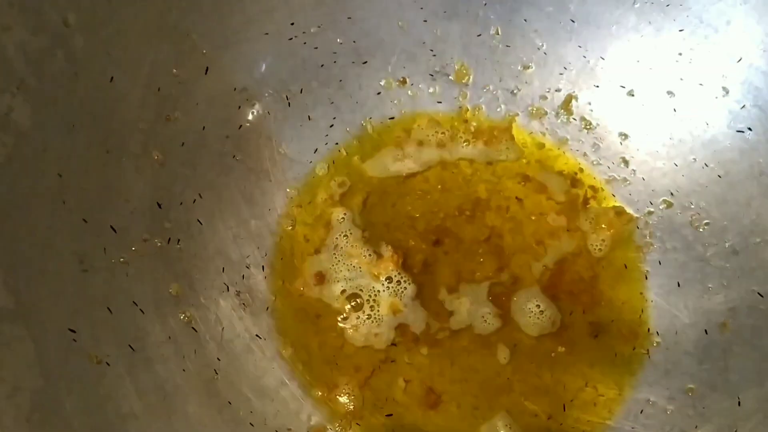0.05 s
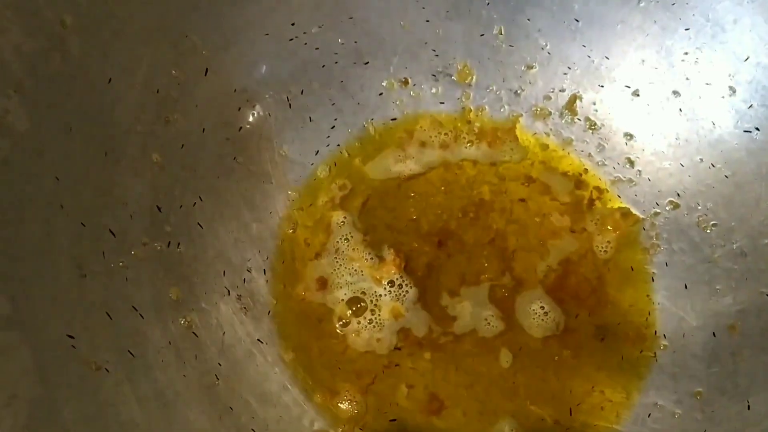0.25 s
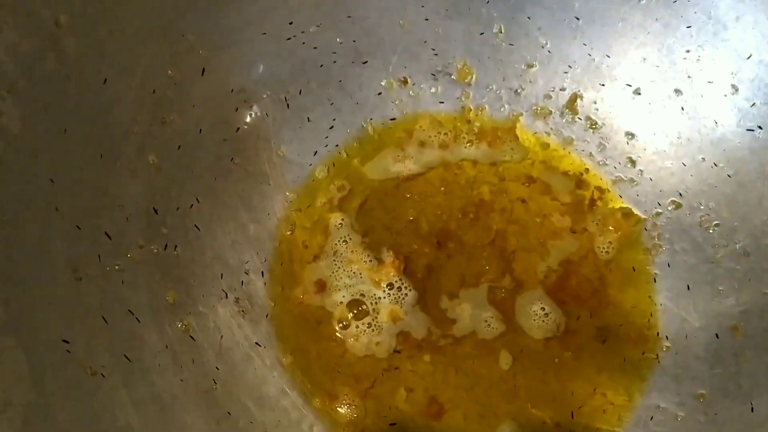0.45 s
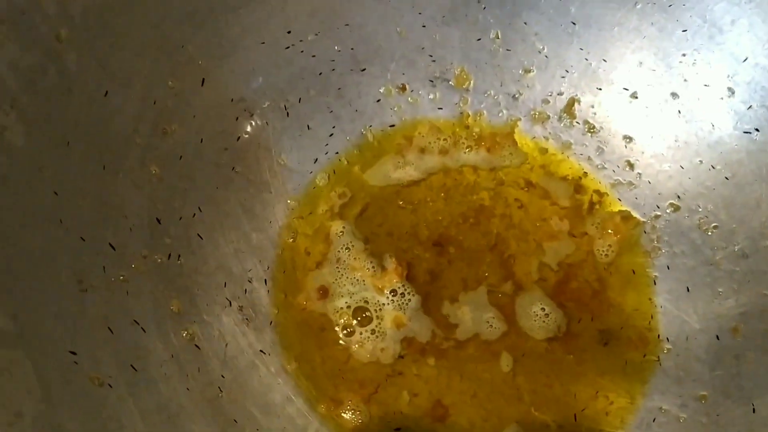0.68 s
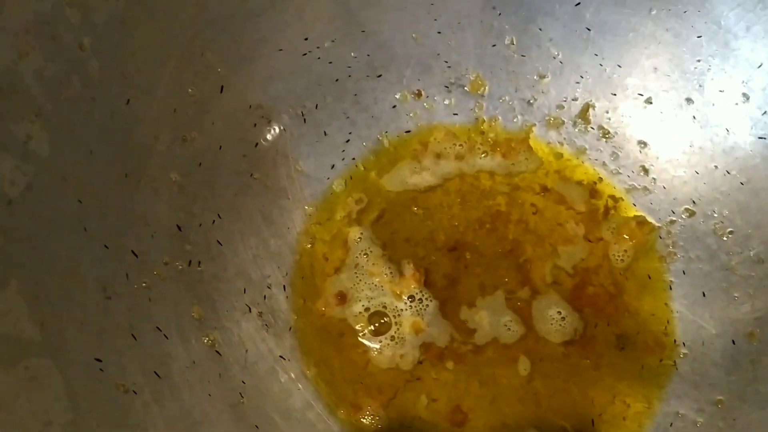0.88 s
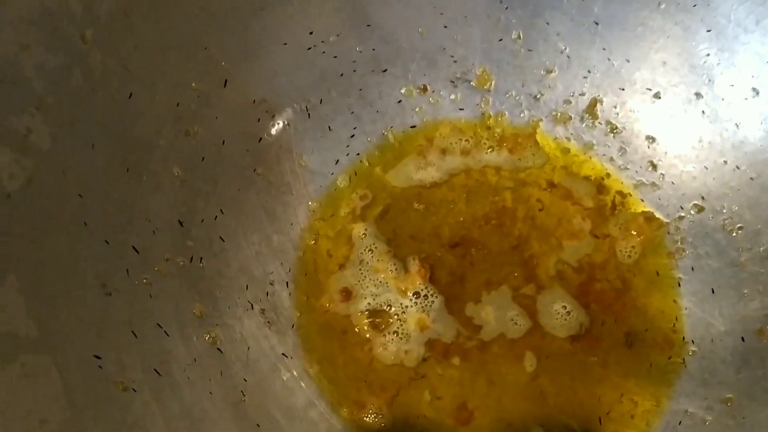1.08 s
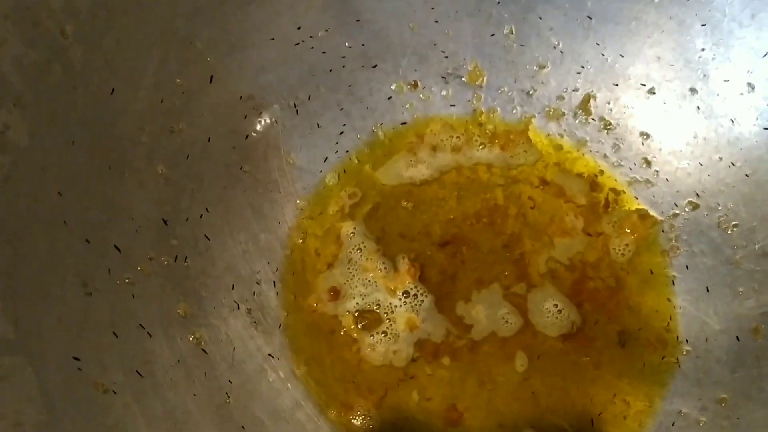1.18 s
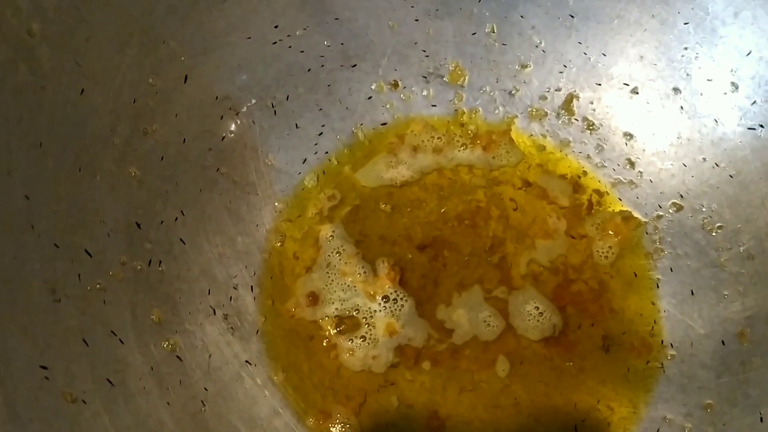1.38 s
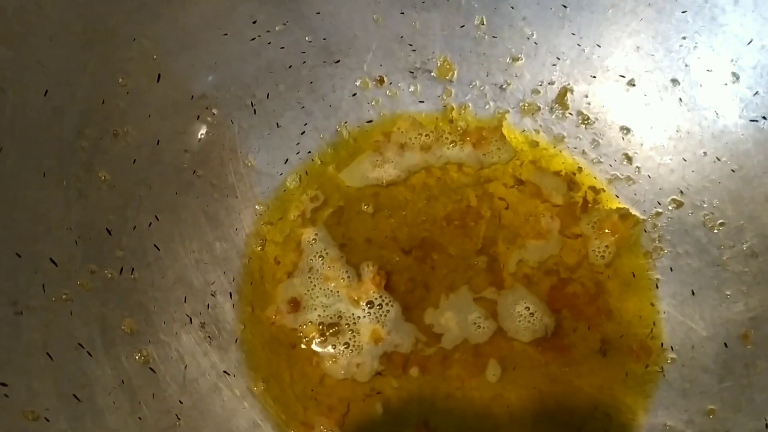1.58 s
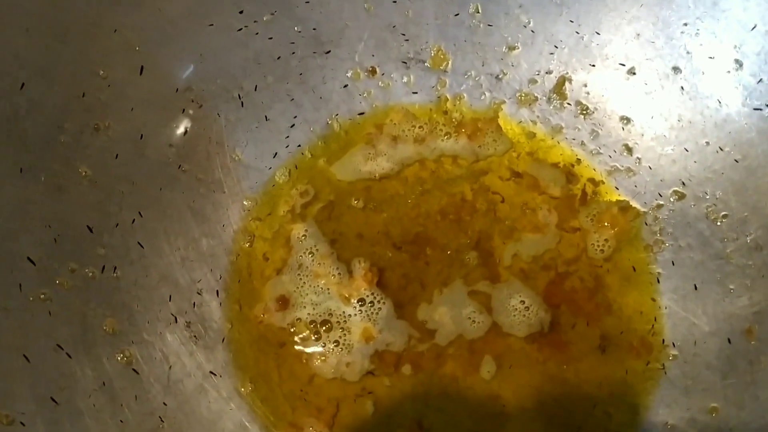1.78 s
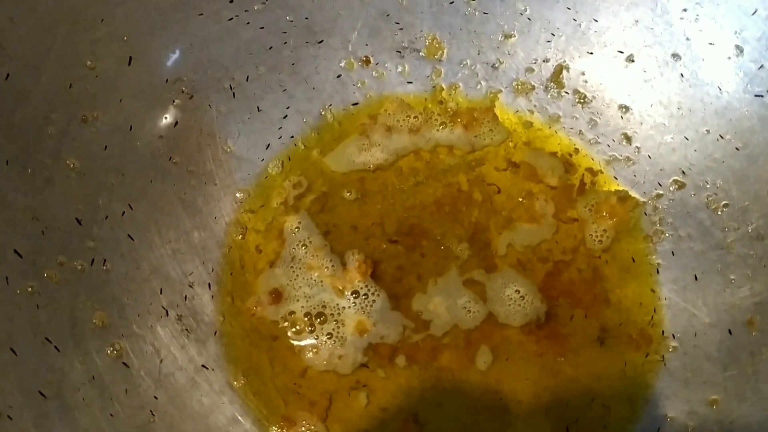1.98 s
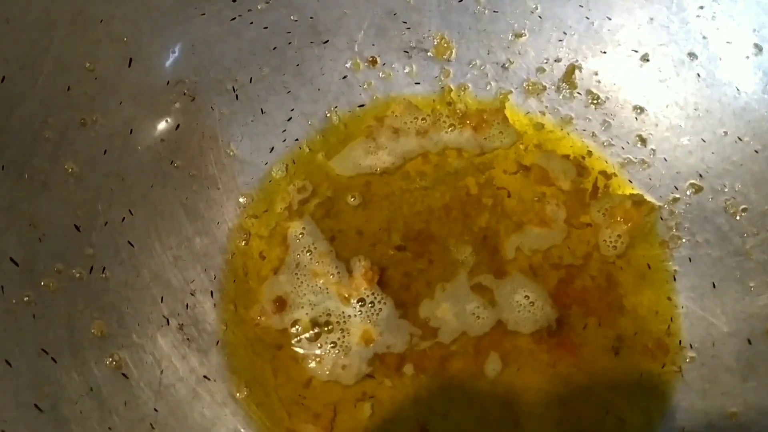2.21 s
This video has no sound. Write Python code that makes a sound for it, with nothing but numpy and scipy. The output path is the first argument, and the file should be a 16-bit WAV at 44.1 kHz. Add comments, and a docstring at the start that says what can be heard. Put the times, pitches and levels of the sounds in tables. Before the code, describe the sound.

Oil with sugar sizzles faintly in a steel pan throughout, over a low hum. Hollow jar knocks and spits start at 0.2 s, with two tiny gliding blips near 0.3 and a strong knock at 0.47. Sharp spits crack at 0.63 and 1.19. Gritty scooping and bright rubbing fill 0.45-1.25. The jar thuds onto the counter at 1.7, clacking again at 1.93, in a small hard-walled kitchen.

```python
"""In a small, hard-walled kitchen a little hot oil with sugar in it sizzles faintly in a steel pan and spits.
Beside it a hollow container, probably the sugar jar, is knocked about, scooped from and set on the counter.
Sizzle, grit and spits are coloured noise and tiny pops; each knock is a set of damped modes plus a clack.
A narrow noise band gives the bright ringing of the rubbed jar; two short gliding blips and a low hum join."""
import sys
import numpy as np
from scipy import signal
from scipy.fft import rfft, irfft, next_fast_len
from scipy.io import wavfile
from scipy.ndimage import map_coordinates

SR = 44100
rng = np.random.default_rng(int(sys.argv[2]) if len(sys.argv) > 2 else 0)


def digitize_waveform(pressure):
    """Quantize a signal to 16-bit integers and store it at the path in sys.argv[1].

    Rows of a 2-D input are taken as channels; values are limited to [-1, 1].
    """
    field = np.atleast_2d(pressure).T
    bounded = np.clip(field, -1, 1)
    quanta = np.round(bounded * 32767).astype(np.int16)
    wavfile.write(sys.argv[1], SR, quanta)


N = 99225
TOP_HZ = 16000


def amp(db):
    """Decibels to gain."""
    return 10 ** (np.asarray(db) / 20)


def unit(x):
    """Scale to rms 1."""
    return x / np.sqrt(np.mean(x ** 2) + 1e-20)


def along(points, hz):
    """Interpolate (Hz, value) points on a log frequency axis."""
    point_hz, value = np.transpose(points)
    return np.interp(np.log(hz + 1), np.log(point_hz + 1), value)


def level(rows):
    """Gain per sample from (s, dB) rows."""
    return amp(np.interp(np.arange(N) / SR, *np.transpose(rows)))


def wobble(knots_per_s):
    """A smooth random curve through normally distributed knots."""
    knots = rng.standard_normal(int(N * knots_per_s / SR) + 4)
    return map_coordinates(knots, [np.arange(N) * knots_per_s / SR])


def filtered(x, response):
    """Multiply the spectrum of x by a response of frequency in Hz."""
    n = x.shape[-1]
    padded = next_fast_len(n + 8192)
    spectrum = rfft(x, padded) * response(np.fft.rfftfreq(padded, 1 / SR))
    return irfft(spectrum, padded)[..., :n]


def coloured(x, points):
    """Shape x by (Hz, dB) points, at rms 1."""
    return unit(filtered(x, lambda hz: amp(along(points, hz))))


def resonant(x, peaks):
    """Pass x through parallel (Hz, width Hz, dB) resonances of alternating sign, at rms 1."""
    def response(f):
        total = 0
        for k, (hz, width_hz, db) in enumerate(peaks):
            damping = 1j * f * width_hz
            total = total + (-1) ** k * amp(db) * damping / (hz * hz - f * f + damping)
        return total
    return unit(filtered(x, response))


def panned(x, left_right_db):
    """Mono to stereo with a level difference, positive to the left."""
    return x * amp(np.array([[left_right_db], [-left_right_db]]) / 2)


def add(track, start_s, x):
    """Mix x into the track, cut at the track's end."""
    part = track[:, round(start_s * SR):][:, :x.shape[-1]]
    part += x[:, :part.shape[-1]]


# Left-right likeness of diffuse sound. Each row: frequency in Hz, correlation.
LIKENESS = [(100, 1), (350, 0.89), (700, 0.61), (1500, 0.14), (5000, 0.21)]


def diffuse(pair):
    """Mix two unrelated signals as mid and side into a field that is alike in the bass."""
    def mid_side_gains(hz):
        angle = np.arccos(np.clip(along(LIKENESS, hz), -1, 1)) / 2
        return np.array([np.cos(angle), np.sin(angle)])
    mid, side = filtered(pair, mid_side_gains)
    return np.array([mid + side, mid - side])


# Decay of the room. Each row: frequency in Hz, t60 in seconds.
ROOM_T60 = [(100, 1), (500, 0.31), (3000, 0.35), (9000, 0.21), (16000, 0.058)]
LEFT_LAG_S = 0.00032


def kitchen(x, room_db):
    """Direct sound, right channel first, plus a diffuse noise tail that decays at each frequency's t60."""
    hz, t, noise = signal.stft(rng.standard_normal((2, SR // 2)), SR, nperseg=256)
    decay = amp(-60 * t / along(ROOM_T60, hz)[:, None])
    tail = diffuse(signal.istft(noise * decay, SR, nperseg=256)[1])
    tail = tail / np.linalg.norm(tail[0])
    delayed = np.pad(x.mean(0), (130, 0))[None]  # samples, about 3 ms
    wet = signal.fftconvolve(delayed, tail, axes=1)
    sides = np.array([[1], [-1]])
    direct = filtered(x, lambda f: np.exp(-1j * np.pi * f * LEFT_LAG_S * sides))
    return direct + amp(room_db) * wet[:, :x.shape[-1]]


def grains(per_s, spread_db):
    """Random one-sample clicks of either sign and uneven size."""
    hits = rng.random(N) < per_s / SR
    sign = rng.choice([-1, 1], N)
    return hits * sign * amp(spread_db * np.minimum(rng.exponential(size=N), 4))


BUBBLE_HZ, BUBBLE_OCTAVES, BUBBLE_CYCLES, BUBBLE_SPREAD_DB = 6000, 0.8, 7, 6


def bubbles(per_s):
    """Tiny pops of uneven size, each a sine of its own pitch that loses 20 dB in a few cycles; rms 1."""
    count = int(per_s * N / SR)
    start, pitch, size = rng.random((count, 3)).T
    octaves = BUBBLE_OCTAVES * np.log(pitch / (1 - pitch)) / 2  # logistic spread
    hz = np.minimum(BUBBLE_HZ * 2 ** octaves, TOP_HZ)
    k = np.arange(256)
    cycles = hz[:, None] * k / SR
    gain = amp(BUBBLE_SPREAD_DB * np.minimum(-np.log(size), np.pi))
    pops = gain[:, None] * np.sin(2 * np.pi * cycles) * amp(-20 * cycles / BUBBLE_CYCLES)
    samples = (start * N).astype(int)[:, None] + k
    return unit(np.bincount(samples.ravel(), pops.ravel(), N)[:N])


# Hum lines. Each row: frequency in Hz, rms level in dB.
HUM_LINES = [(74, -64.5), (100, -58), (131, -63)]
# Rumble spectrum. Each row: frequency in Hz, relative level in dB.
RUMBLE_COLOUR = [(25, -18), (42, 8), (70, -10), (130, 16), (200, 1), (300, -12.5), (800, -13),
                 (3000, -14.5)]
RUMBLE_DB = -56


def hum():
    """Sines wavering in level and phase over diffuse low noise, probably the stove and a fan."""
    t = np.arange(N) / SR
    lines = 0
    for hz, db in HUM_LINES:
        gain = np.sqrt(2) * amp(db + 0.37 * wobble(7.8))
        lines = lines + gain * np.sin(2 * np.pi * hz * t + 0.5 * wobble(6.94))
    rumble = coloured(diffuse(rng.standard_normal((2, N))), RUMBLE_COLOUR)
    return lines + amp(RUMBLE_DB) * rumble


# Sizzle spectrum. Each row: frequency in Hz, relative level in dB.
SIZZLE_COLOUR = [(600, -13.5), (1100, -18), (2000, -3), (5500, -0.5), (8200, 4), (10500, 4), (12500, -7.5),
                 (16000, -35)]
SIZZLE_DB, SIZZLE_PER_S = -64.5, 900
RIGHT_SIDE_DB, RIGHT_SIDE_ROOM_DB = -23.5, -3  # shared with the narrow band


def sizzle():
    """Many tiny bubbles burst over a soft hiss."""
    fizz = bubbles(SIZZLE_PER_S) + 2 * rng.standard_normal(N)
    sound = amp(SIZZLE_DB) * coloured(fizz, SIZZLE_COLOUR)
    return kitchen(panned(sound, RIGHT_SIDE_DB), RIGHT_SIDE_ROOM_DB)


# Faint hiss, then the jar's bright ringing. Each row: time in seconds, level in dB.
NARROW_BAND_LEVEL = [(.19, -69.5), (.4, -70.5), (.62, -57.5), (1.3, -85)]
# Its spectrum. Each row: frequency in Hz, relative level in dB.
NARROW_BAND_COLOUR = [(1400, -21.5), (1800, -2.5), (2400, -4.5), (3100, -31)]


def narrow_band():
    """A narrow band of noise: faint hiss at first, then a swell of bright ringing as the jar is rubbed."""
    band = level(NARROW_BAND_LEVEL) * coloured(rng.standard_normal(N), NARROW_BAND_COLOUR)
    return kitchen(panned(band, RIGHT_SIDE_DB), RIGHT_SIDE_ROOM_DB)


# Gliding blips. Each row: start in seconds, length in seconds, first Hz, last Hz, peak in dB.
GLIDES = [(.292, .025, 1900, 330, -35.5), (.328, .016, 380, 1000, -40)]
RING_ROOM_DB = -14  # shared with the low ring of the knocks


def blips():
    """Two short sines glide as they swell and fade, the first down, the second up."""
    out = np.zeros((2, N))
    for start_s, length_s, from_hz, to_hz, db in GLIDES:
        u = np.linspace(0, 1, round(length_s * SR))
        hz = from_hz * (to_hz / from_hz) ** (u ** 2 / 2 + u / 2)
        phase = 2 * np.pi * np.cumsum(hz) / SR
        add(out, start_s, panned(amp(db) * np.sin(np.pi * u ** 2) * np.sin(phase), 0))
    return kitchen(out, RING_ROOM_DB)


# Gritty hiss of scooping. Each row: time in seconds, level in dB before the trim.
GRIT_LEVEL = [(.19, -70), (.25, -54), (.40, -52.5), (.44, -43), (.60, -43.5), (.725, -45.5), (.755, -30.5),
              (.815, -36), (.85, -41), (.895, -32.5), (.95, -40), (1.03, -46), (1.07, -39.5), (1.16, -45.5),
              (1.24, -48.5), (1.32, -69), (1.64, -62.5), (1.72, -43.5), (1.87, -101)]
# Its spectrum. Each row: frequency in Hz, relative level in dB.
GRIT_COLOUR = [(200, -31), (700, -3.5), (1100, 5), (1600, -2), (2800, 0.5), (5500, -3.5), (9500, 3),
               (12000, 0.5), (16000, -10.5)]
# Rubbing of the jar. Each row: time in seconds, level in dB before the trim.
RUB_LEVEL = [(.21, -65), (.25, -48.5), (.44, -48), (.51, -44.5), (.64, -39.5), (.71, -46), (.90, -47),
             (1.03, -52.5), (1.12, -45), (1.25, -64), (1.40, -54.5), (1.66, -60.5), (2.0, -52.5),
             (2.25, -53.5)]
# Resonances of the rubbed jar. Each row: frequency in Hz, width in Hz, relative level in dB.
RUB_RESONANCES = [(78.7, 9.8, -2.5), (390, 32.4, 0), (618, 21, -6.5), (863, 134, -17.5), (1074, 91, -16.5)]
GRIT_PER_S, GRIT_ROUGH_DB, GRIT_ROOM_DB, SCOOP_TRIM_DB = 1500, 1.6, -0.5, -7.5


def scoop():
    """Crystals grind and crackle unevenly under the spoon; the rubbing sounds the jar's resonances."""
    crackle = unit(grains(GRIT_PER_S, spread_db=1.5)) + 0.5 * bubbles(GRIT_PER_S / 3)
    roughness = amp(GRIT_ROUGH_DB * wobble(69.46))
    grit = level(GRIT_LEVEL) * roughness * coloured(crackle, GRIT_COLOUR)
    rub = level(RUB_LEVEL) * resonant(grains(per_s=700, spread_db=3), RUB_RESONANCES)
    return kitchen(amp(SCOOP_TRIM_DB) * (panned(grit, -4.5) + rub), GRIT_ROOM_DB)


# Oil spits, and at 1.925 the bright clack of the jar's knock.
# Each row: start in seconds, level in dB, lift of the mids in dB, left-right difference in dB.
SPITS_AND_CLACK = [(0.2008, -32.5, -3, -5), (0.246, -36.5, 0, -9), (0.4157, -26.5, 9, -7.5),
                   (0.5328, -36.5, 20, -5), (0.6251, -22, 9.5, -4), (1.1852, -22, -0.5, -6),
                   (1.341, -34, 3, -7.5), (1.445, -31, -0.5, 4), (1.477, -34, 4, -9.5),
                   (1.561, -32, -1.5, -1.5), (1.7623, -30, -1.5, 1.5), (1.7929, -34, -1, -8),
                   (1.925, -38, 12.5, 4), (2.182, -38.5, 6.5, 3)]
# Spectrum of the burst. Each row: frequency in Hz, relative level in dB.
BURST_COLOUR = [(500, -31), (1000, -10), (1500, -11.5), (3000, -8.5), (5500, -1.5), (9500, 0.5),
                (12000, -2.5), (16000, -30)]
# Resonances of the steel pan. Each row: frequency in Hz, width in Hz, relative level in dB.
PAN_RESONANCES = [(2195, 186, -2.5), (2880, 133, 0.5), (5160, 620, -5.5), (7530, 110, 10.5),
                  (9300, 2700, -0.5)]
SNAP_DB, SNAP_T60_S = -3.5, 0.0053
PUFF_DB, PUFF_RISE_S, PUFF_T60_S = 1, 0.0016, 0.019
FROTH_DB, FROTH_T60_S, FROTH_PER_S = -13, 0.14, 1500
SPIT_ROOM_DB = -6


def spits_and_clack():
    """Oil spits: a crack, a puff of steam, froth fizzing in the ringing pan; one burst is a knock's clack."""
    out, t = np.zeros((2, N)), np.arange(SR // 2) / SR
    puff = amp(PUFF_DB - 60 * t / PUFF_T60_S) * (1 - np.exp(-t / PUFF_RISE_S))
    snap = amp(SNAP_DB - 60 * t / SNAP_T60_S)
    fading = amp(FROTH_DB - 60 * t / FROTH_T60_S)
    for start_s, db, mids_db, left_right_db in SPITS_AND_CLACK:
        mids = [(2500, mids_db), (6000, 0)]
        noise = rng.standard_normal(len(t))
        burst = unit(filtered(noise, lambda hz: amp(along(BURST_COLOUR, hz) + along(mids, hz))))
        fizz = grains(FROTH_PER_S, spread_db=1)[:len(t)]
        froth = coloured(resonant(fizz, PAN_RESONANCES), mids)
        sound = amp(db) * ((puff + snap) * burst + fading * froth)
        add(out, start_s, kitchen(panned(sound, left_right_db), SPIT_ROOM_DB))
    return out


def ring(modes, t, pitch=1):
    """Sum damped (Hz, dB, t60 s) modes, each slightly varied in level and pitch at every blow."""
    total = 0
    for hz, db, t60_s in modes:
        decay = amp(db + rng.normal(0, 1) - 60 * t / t60_s)
        blow_hz = hz * pitch * (1 + rng.normal(0, 0.0056))
        total = total + decay * np.sin(2 * np.pi * blow_hz * t)
    return total


# Knocks of the jar. Each row: start in seconds, cavity in dB, wall in dB, counter in dB, cavity pitch factor.
KNOCK_EVENTS = [(0.206, -23, -34.5, -31, 1.055), (.222, -39, -33.5, -43, 1.0), (0.334, -47, -52, -35, 1.2),
                (.354, -35.5, -56, -49, 0.95), (0.4734, -21, -27.5, -41.5, 1.064),
                (.594, -30.5, -41.5, -62, 1.07), (.629, -34.5, -35.5, -56.5, 1.06),
                (0.958, -38.5, -71, -85, 1.16), (1.076, -35, -44, -75, 1.09),
                (1.125, -28, -38.5, -75, 1.06), (1.189, -36, -67, -61, 1.04), (1.559, -57, -55, -47, 1.35),
                (1.707, -23, -40.5, -25, 1.036), (1.726, -34.5, -50.5, -33.5, 0.86),
                (1.775, -35, -60, -33.5, 0.93), (1.928, -33.5, -41.5, -26, .86),
                (1.940, -43, -40.5, -37.5, 1.1), (1.953, -49, -45.5, -41, 0.97),
                (2.124, -45.5, -48.5, -41, 0.93), (2.189, -50.5, -46, -42.5, 1.08)]
# Modes of the air in the jar. Each row: frequency in Hz, relative level in dB, t60 in seconds.
CAVITY_MODES = [(346.1, 1.5, 0.18), (391, -3.5, 0.15), (443, -13.5, 0.16)]
# Modes of the jar's wall. Each row: frequency in Hz, relative level in dB, t60 in seconds.
WALL_MODES = [(605, -7.5, 0.17), (646, -14, 0.23), (908, -1, 0.032), (1065, -1, 0.043), (1151, -19, 0.4),
              (1745, -6.5, 0.041)]
# Modes of the counter. Each row: frequency in Hz, relative level in dB, t60 in seconds.
COUNTER_MODES = [(75, -3, 0.085), (139.2, -8, 0.44), (223.8, -13.5, 0.31), (299.4, -9, 0.26),
                 (313, 3, 0.042)]
# Spectrum of the contact noise. Each row: frequency in Hz, relative level in dB.
CLACK_COLOUR = [(100, -58), (450, -2.5), (720, -2), (1100, 0), (1400, -3), (2800, -13.5), (16000, -29)]
# The jar moves to the left. Each row: time in seconds, left-right difference in dB.
JAR_PLACE = [(1.2, 1.5), (1.7, 5.5)]
CLACK_DB, CLACK_T60_S, COUNTER_CLACK_DB = -2.5, 0.059, -17
RING_RISE_S, KNOCK_ROOM_DB = 0.0051, -6


def knocks():
    """Each blow rings the jar's air, its wall and the counter; the wall's sound scatters more in the room."""
    out, t = np.zeros((2, N)), np.arange(SR // 2) / SR
    swell = 1 - np.exp(-t / RING_RISE_S)
    for start_s, cavity_db, wall_db, counter_db, pitch in KNOCK_EVENTS:
        left_right_db = np.interp(start_s, *np.transpose(JAR_PLACE))
        cavity = panned(amp(cavity_db) * ring(CAVITY_MODES, t, pitch), left_right_db)
        counter = panned(amp(counter_db) * ring(COUNTER_MODES, t), left_right_db / 2)
        noise = coloured(rng.standard_normal(len(t)), CLACK_COLOUR)
        clack = amp(CLACK_DB - 60 * t / CLACK_T60_S) * noise
        wall = amp(wall_db) * (ring(WALL_MODES, t) + clack)
        hard = panned(wall + amp(counter_db + COUNTER_CLACK_DB) * clack, left_right_db / 2 - 7.0)
        low = swell * (cavity + counter)
        add(out, start_s, kitchen(low, RING_ROOM_DB) + kitchen(hard, KNOCK_ROOM_DB))
    return out


def scene():
    """Room, pan and jar together."""
    return hum() + sizzle() + narrow_band() + blips() + scoop() + spits_and_clack() + knocks()


def record(dry):
    """The microphone sheds the deepest bass; nothing is kept from the band limit up."""
    b, a = signal.butter(2, 45, "high", fs=SR)
    return filtered(signal.lfilter(b, a, dry), lambda hz: hz < TOP_HZ)


dry = scene()
out = record(dry)
digitize_waveform(out)
```